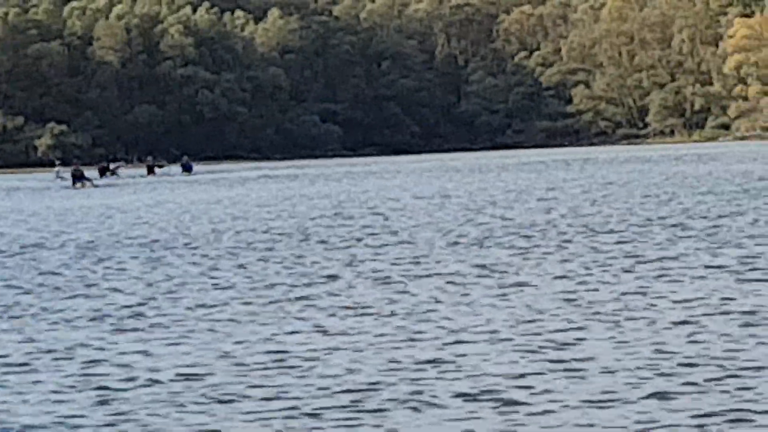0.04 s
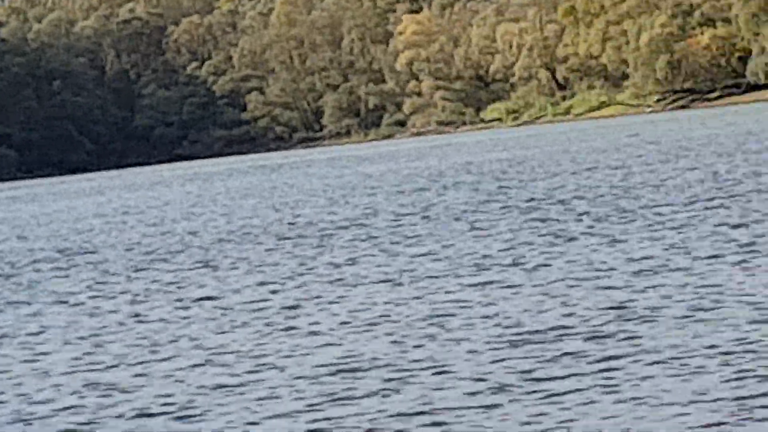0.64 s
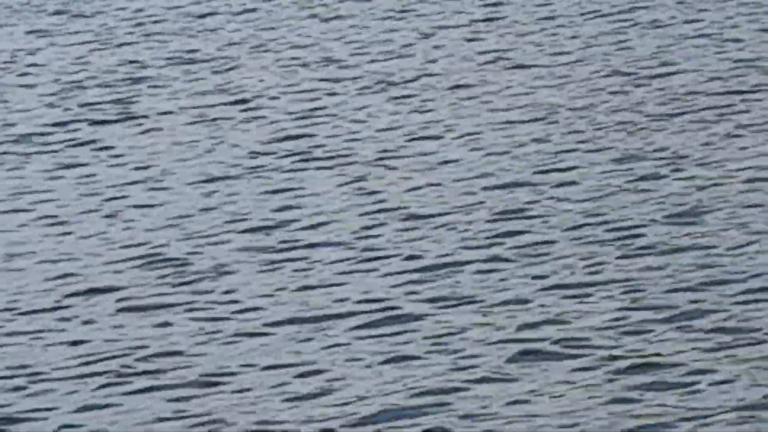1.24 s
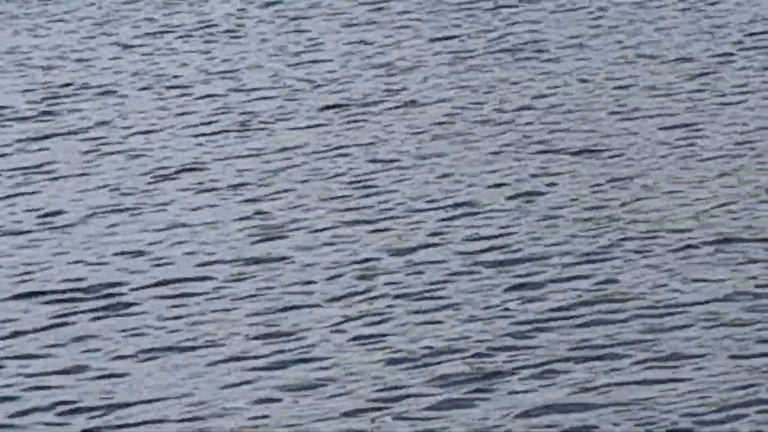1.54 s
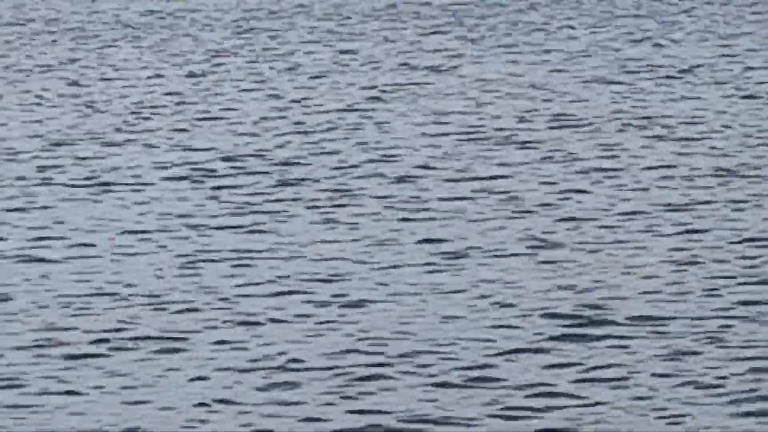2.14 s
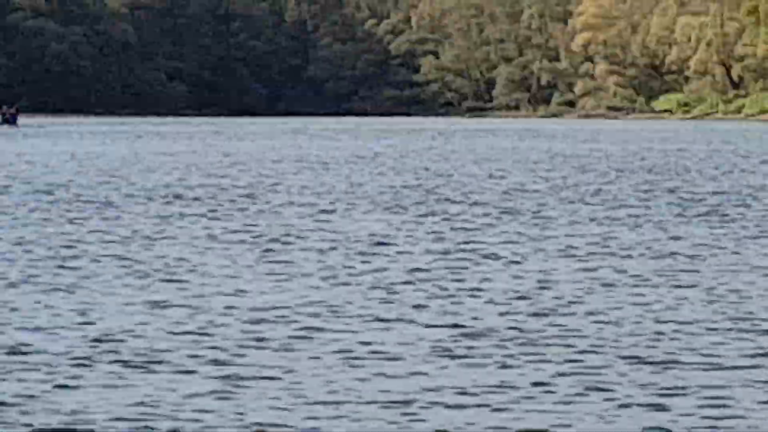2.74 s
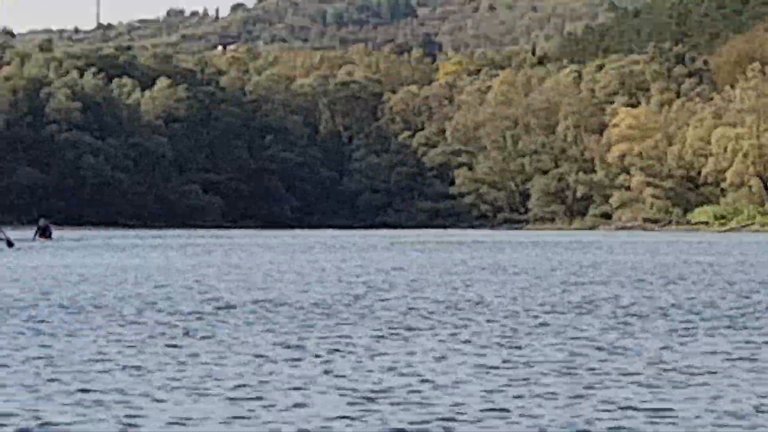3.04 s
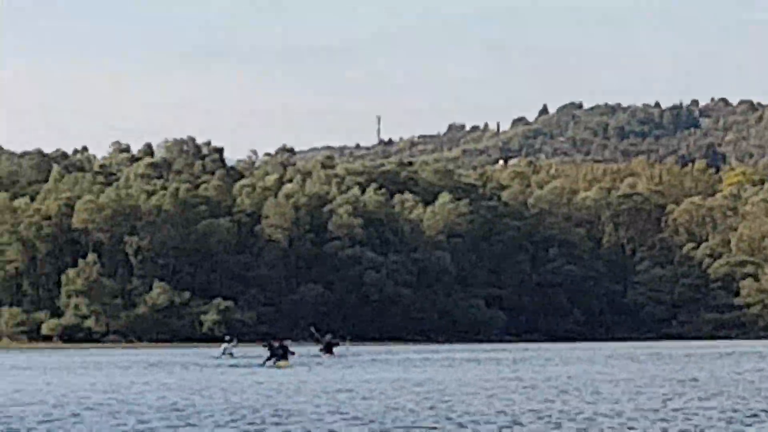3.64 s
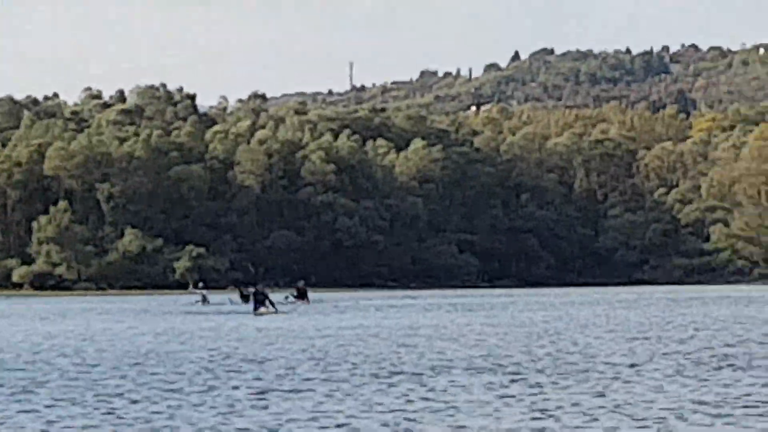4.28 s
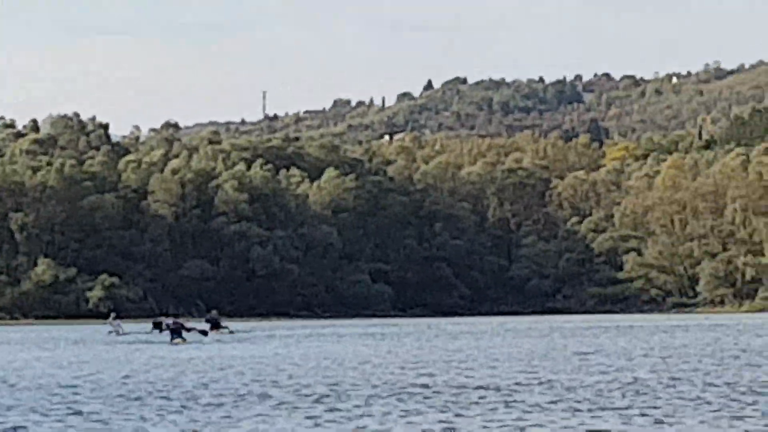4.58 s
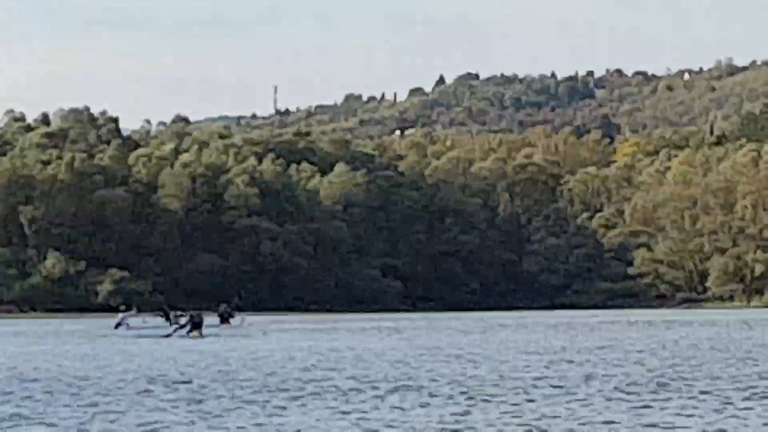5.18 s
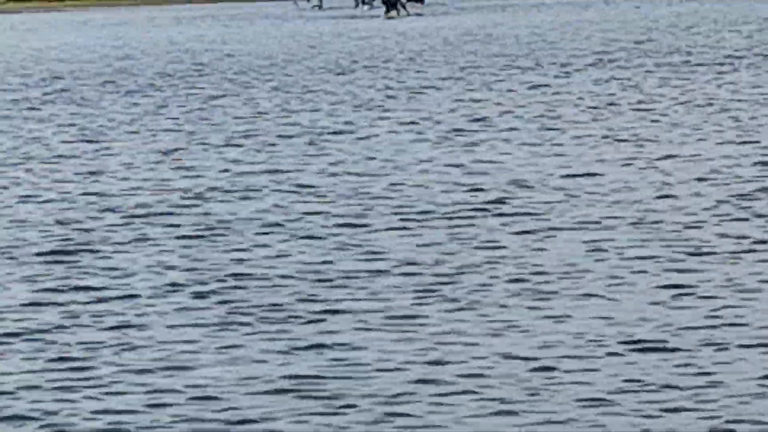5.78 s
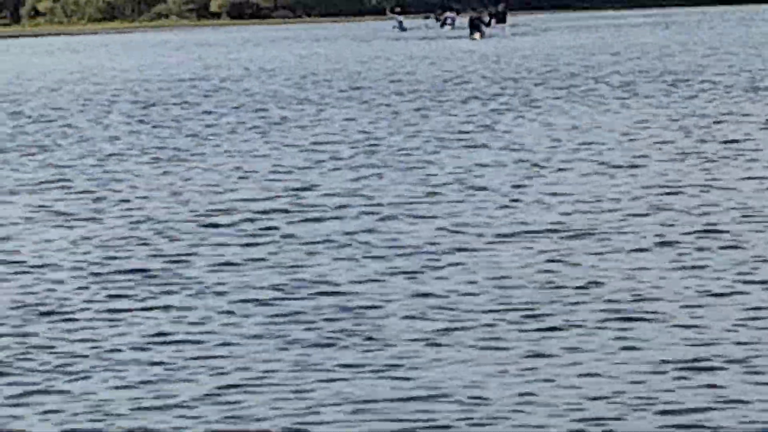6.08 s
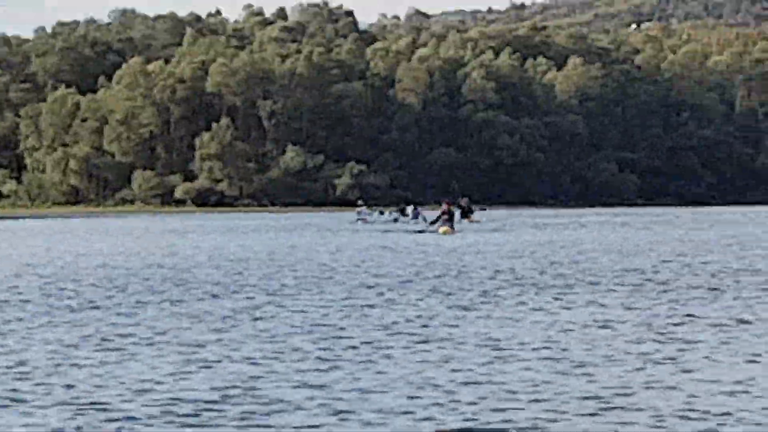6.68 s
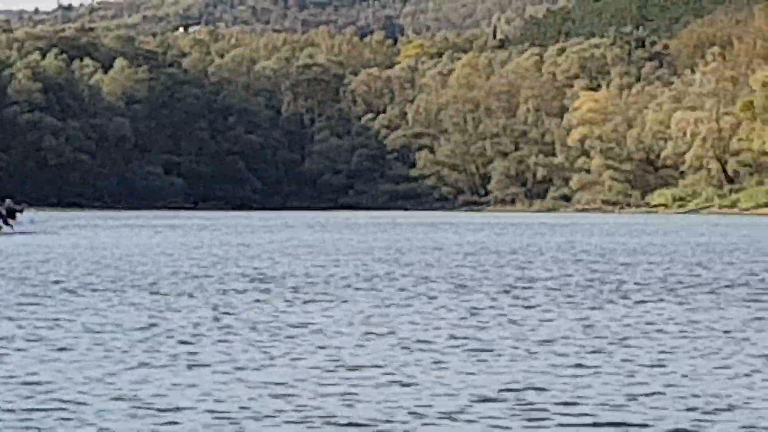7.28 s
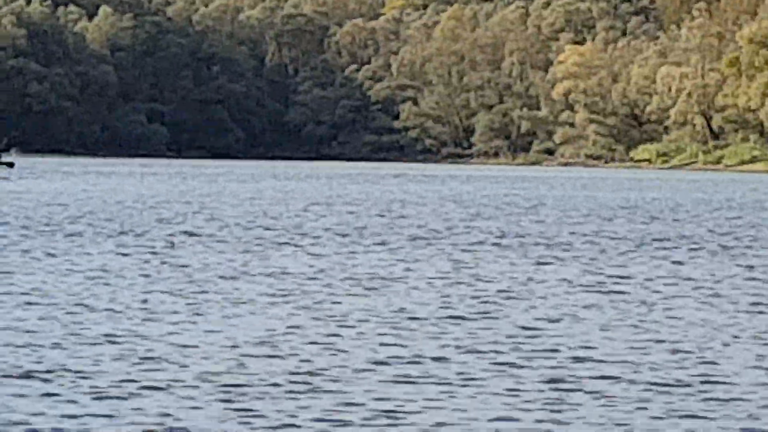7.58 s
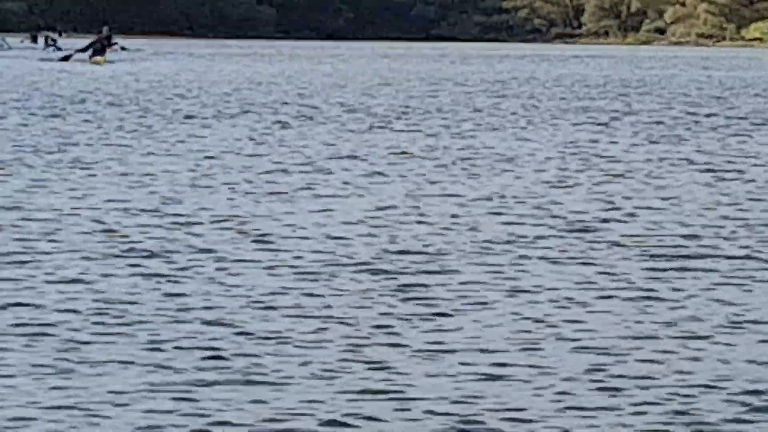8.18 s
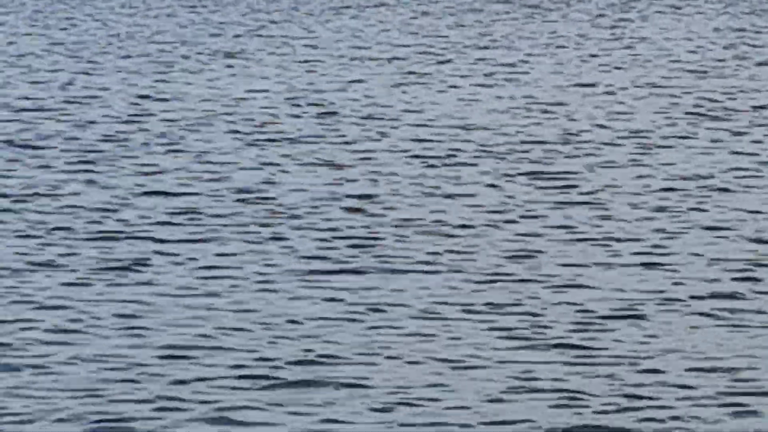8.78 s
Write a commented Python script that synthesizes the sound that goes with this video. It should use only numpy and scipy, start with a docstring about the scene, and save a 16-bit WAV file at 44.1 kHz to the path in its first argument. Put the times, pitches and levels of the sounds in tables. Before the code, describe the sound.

A small motorboat's engine runs at a steady speed for about nine seconds, heard from on board on a calm lake: a low exhaust hum with a fast clatter. Water washes and fizzes along the hull throughout. A light breeze buffets the microphone from alternating sides, with soft low thumps mostly in the first two seconds and occasionally afterwards. A sharp click and knock from a loose fitting comes at about 0.8 seconds. From roughly 2.7 to 5.6 seconds the engine's knock hardens and a loose metal cover rattles in bouts, returning briefly near 7 seconds. More dry ticks and light knocks fall around 1.8, 3.7, 4.2 and 4.8 seconds, with fainter ones after 8. A brief squeak sounds near 4.7 seconds, and tiny high ones follow between 6.4 and 8. The spray's hiss grows slightly from about 5 seconds, peaking near 7.5.

```python
"""A low exhaust hum and a clattering engine, heard on board a small motorboat cruising a calm lake.
The engine fires twice a cycle; midway its knock hardens and a loose valve cover rattles in bouts.
Water washes and fizzes along the hull, and a light breeze buffets the two microphone ports in turn.
Loose fittings tick and knock now and then, and some rub with a brief squeak."""
import sys
import numpy as np
from scipy.fft import rfft, irfft, next_fast_len
from scipy.io import wavfile
from scipy.ndimage import map_coordinates

SR = 44100
rng = np.random.default_rng(int(sys.argv[2]) if len(sys.argv) > 2 else 0)


def log_audio(samples):
    """Write samples as a 16-bit WAV file to the path given in sys.argv[1]."""
    # one column per channel
    frames = np.atleast_2d(samples).T
    # limit to full scale, then quantise
    limited = np.clip(frames, -1, 1)
    pcm = np.round(limited * 32767).astype(np.int16)
    wavfile.write(sys.argv[1], SR, pcm)


N = 393372
TIME = np.arange(N) / SR

# The engine's pace. Each row: time in seconds, cycles a second.
ENGINE_SPEED = [(0.0, 31.29), (0.71, 30.67), (1.13, 31.65), (1.77, 30.64), (2.95, 30.81), (3.3, 31.43),
                (4.54, 30.11), (4.89, 30.73), (6.11, 30.14), (6.71, 30.77), (8.12, 30.77), (8.57, 31.54),
                (8.92, 30.56)]
# The drift of the engine's main stroke. Each row: time in seconds, lateness in cycles.
STROKE_LATENESS = [(2.6, -0.02), (3.3, 0.07), (3.6, 0), (3.9, -0.11), (4.2, -0.1), (4.55, -0.19),
                   (5.25, -0.13), (5.6, -0.16), (7, -0.11)]
# The harmonics of the hum. Each row: multiple of the cycle rate, relative level in dB.
EXHAUST_ORDERS = [(1, -20.5), (2, 0.5), (3, -18), (4, -27.5), (5, -28), (6, -23), (7, -32), (8, -29.5),
                  (9, -31.5), (10, -33), (11, -45), (12, -35.5)]

# Fader rides for engine and water. Each row: time in seconds, level in dB.
CASING_RIDE = [(0, -49.5), (2.3, -48.5), (3.0, -48), (3.65, -46.5), (3.95, -48), (5.5, -48), (5.75, -49),
               (6.9, -47.5), (8.92, -49.5)]
VALVE_RIDE = [(0, -78), (2.3, -71), (3.3, -54.5), (5.8, -58.5), (6.5, -54.5), (7, -54), (8, -54),
              (8.92, -63.5)]
FIRING_RIDE = [(0, -66), (2.3, -59), (2.75, -46), (3.05, -42.3), (3.6, -42), (3.95, -45.5), (4.6, -48),
               (5.35, -46), (5.8, -59), (8.92, -63)]
SPRAY_RIDE = [(0, -69), (2.3, -68), (3.9, -69.5), (5.25, -62), (6.0, -63.5), (7.1, -62), (7.9, -62),
              (8.4, -64.5)]
FOAM_RIDE = [(0, -59.5), (3.1, -61), (4.2, -58.5), (4.8, -54.5), (4.98, -70)]

# How the struck parts ring. Each row: pitch in Hz, bandwidth in Hz, relative level in dB.
CASING_MODES = [(401, 79, 1.5), (634, 99, 2.5), (1091, 60, 0.5), (1270, 37, -27), (1550, 35, 3),
                (1860, 190, -7), (2560, 37, -7), (3040, 71, -8)]
VALVE_MODES = [(1160, 50, -2), (1890, 80, 2), (2510, 70, 4), (3180, 220, -9), (4300, 500, -13)]
BLOCK_MODES = [(362, 75, 8.5), (660, 77, 11.5), (1111, 25, 6), (1240, 58, -1.5), (1590, 21, 4),
               (1980, 230, -12), (2614, 29, -6.5), (2944, 81, -5)]
FITTING_MODES = [(443, 480, 0.5), (604, 91, 7), (718, 42, 8), (966, 175, 4.5), (1290, 187, 5.5),
                 (2050, 300, 0), (2520, 380, -3), (5900, 750, -12.5)]

# The tone of each noise layer. Each row: frequency in Hz, relative level in dB.
EXHAUST_RUMBLE_EQ = [(15, -7), (35, 5.5), (90, 4), (200, -9.5), (350, -18.5), (600, -22), (2000, -58)]
VALVE_RUSTLE_EQ = [(900, -32), (1900, 9), (2550, 4.5), (3200, 6), (4400, 4.5), (5200, -15), (9000, -28)]
FIRING_THUD_EQ = [(200, -15), (370, 0), (510, -5), (690, 4), (900, -5), (1300, -2), (2300, -9), (3100, -6),
                  (3600, -20), (5000, -25), (9000, -45)]
WASH_EQ = [(150, 4), (400, 3.5), (520, -11.5), (700, 7), (850, -1.5), (1200, -1), (2600, -4), (3600, -12.5),
           (5800, -15.5), (6900, -22), (8000, -18), (9000, -48), (16000, -35)]
SPRAY_EQ = [(3000, -28), (5500, -7), (6900, -2.5), (7900, -2), (9000, -2), (10300, -1), (11700, -6),
            (13000, -5), (16000, -12.5)]
FOAM_EQ = [(3400, -24), (4500, 1.5), (5900, 3), (6600, -13), (7850, -3.5), (11000, -29.5)]
BUFFET_EQ = [(20, -13), (50, 2), (100, 5.5), (170, 1), (260, -7.5), (380, -19), (600, -29), (1200, -42),
             (4000, -91)]

# Gusts on the ports. Each row: centre in seconds, width in seconds, left and right levels in dB.
BREEZE_GUSTS = [(0.032, 0.018, -17.5, -21), (0.2, 0.13, -30.5, -20.5), (0.4, 0.047, -32, -20),
                (0.63, 0.035, -30, -23), (0.78, 0.068, -31, -23.5), (1.01, 0.053, -44, -19),
                (1.14, 0.077, -34, -20.5), (1.33, 0.053, -35, -22.5), (1.53, 0.099, -30, -27.5),
                (1.93, 0.11, -46, -23), (2.72, 0.025, -31, -23), (3.73, 0.0086, -21.5, -36),
                (4.02, 0.04, -53, -26), (4.24, 0.068, -22.5, -36), (4.65, 0.051, -33, -26.5),
                (5.5, 0.14, -30, -48), (6.17, 0.16, -31.5, -35), (6.36, 0.1, -28, -33),
                (7.0, 0.11, -26.5, -43), (7.34, 0.019, -44, -26), (8.52, 0.018, -27, -25.5),
                (8.62, 0.041, -27, -37)]
# Single eddies. Each row: centre in seconds, level at the louder port in dB, pitch in Hz,
# left over right in dB.
EDDY_THUMPS = [(0.039, -12.5, 182, 22), (0.247, -11, 177, 20), (0.38, -13, 197, -22), (0.776, -12, 185, 24),
               (0.986, -10, 197, -23), (1.11, -13.5, 199, -23), (1.16, -11.5, 216, -23),
               (1.524, -17, 278, 3), (1.893, -14, 188, -12), (2.607, -10.5, 133, 22), (2.659, -17, 224, -7),
               (4.05, -13, 179, -21), (5.065, -11.5, 200, -26), (5.137, -14, 174, 22),
               (6.147, -16, 195, 22), (6.188, -14, 207, 20), (6.339, -14, 227, 14), (8.612, -13.5, 230, 28)]
# Dry ticks close by. Each row: start in seconds, level in dB, left over right in dB, pitch factor.
CONTACT_TICKS = [(0.7917, -9.5, 17, 2.2), (1.481, -28.5, 14.5, 1.3), (1.523, -29, 11, 1.7),
                 (3.051, -32, -4, 1.1), (3.735, -20, 8, 0.94), (3.762, -23.5, -6, 0.91),
                 (4.112, -30, -4, 0.79), (4.1867, -18.5, -16.5, 0.93), (4.7976, -14, -17, 1),
                 (4.829, -30, -10, 0.92), (5.539, -32, -7, 1.07), (6.283, -30, 5, 1.5),
                 (8.006, -28, 7, 1.1), (8.237, -30, 8, 0.7), (8.67, -32, 8, 1.3), (8.748, -28, 9, 1.4)]
# The ring of a tick. Each row: pitch in Hz, relative level in dB, seconds to die away by 60 dB.
TICK_MODES = [(2520, -6, 0.0094), (4270, 6.5, 0.00062), (6200, 4, 0.0019), (8200, -2.5, 0.0031),
              (11500, -5.5, 0.0018)]
# Loose fittings knocking. Each row: start in seconds, relative strength in dB, extra crack in dB,
# left over right in dB.
FITTING_KNOCKS = [(0.7919, -7.5, 1, 0), (0.81, -22, -18, -2.5), (0.846, -29.5, -5, -4),
                  (0.925, -25.5, -8, -2), (1.5171, -31.5, 4.5, -3), (1.838, -17.5, 0, 1),
                  (2.781, -21, -5, 1), (3.736, -17.5, -1, 3), (4.61, -30, -20, 2), (4.654, -26.5, -17, 3),
                  (4.677, -27, -13, 5), (5.505, -26, -9, 8), (8.033, -33.5, 8.5, 2),
                  (8.671, -31.5, 1, 10.5)]
# Bouts of valve cover rattle. Each row: start in seconds, end in seconds, level in dB, pitch in Hz.
COVER_BOUTS = [(2.85, 3.17, -60.5, 3750), (3.17, 3.68, -56, 3930), (3.68, 4.55, -58.5, 4080),
               (4.85, 5.6, -59, 4090), (6.92, 7.13, -61, 4100)]
# Fittings rubbing. Each row: centre in seconds, pitch in Hz, level in dB, width in seconds,
# relative level of the octave in dB.
FITTING_SQUEAKS = [(4.673, 5600, -46, 0.0027, -35), (4.732, 2935, -37.5, 0.015, -8),
                   (6.427, 6100, -46, 0.0063, -28), (6.624, 6050, -46, 0.01, -30),
                   (7.687, 6100, -47, 0.005, -30), (7.978, 6062, -43.5, 0.0061, -27)]

# The colour of the two ports. Each row: frequency in Hz, left over right in dB.
PORT_BALANCE = [(300, -2), (700, -0.5), (1100, 2), (2500, -0.5), (4000, 3.5), (5600, -6.5), (7000, 4.5),
                (8500, -15), (10000, -12), (11700, -2), (16000, 3)]
# The stereo width of the noise. Each row: frequency in Hz, left-right correlation from -1 to 1.
PORT_LIKENESS = [(100, 0.72), (600, 0.69), (900, -0.13), (1500, -0.34), (2600, -0.23), (4000, -0.16),
                 (16000, 0.13)]


def amp(db):
    """Decibels to gain."""
    return 10 ** (np.asarray(db) / 20)


def unit(x):
    """Scale to rms 1."""
    return x / np.sqrt(np.mean(x ** 2) + 1e-20)


def along(points, hz):
    """Read (Hz, value) points on a log frequency axis."""
    freqs, values = np.transpose(points)
    return np.interp(np.log(hz + 1), np.log(freqs + 1), values)


def ride(points):
    """Join (seconds, value) points into one value a sample."""
    return np.interp(TIME, *np.transpose(points))


def wobble(rate):
    """A smooth random curve, rate knots a second."""
    return map_coordinates(rng.standard_normal(int(N * rate / SR) + 4), [TIME * rate], mode="nearest")


def swell(centre_s, width_s):
    """A bell-shaped rise to 1 and back."""
    return np.exp(-.5 * ((TIME - centre_s) / width_s) ** 2)


def filtered(x, response):
    """Filter x by a complex response of frequency."""
    size = next_fast_len(N + SR // 2)
    return irfft(rfft(x, size) * response(np.fft.rfftfreq(size, 1 / SR)), size)[..., :N]


def coloured(x, eq):
    """Play x through a (Hz, dB) curve, at rms 1."""
    return unit(filtered(x, lambda hz: amp(along(eq, hz))))


def resonant(x, modes):
    """Ring x through (Hz, bandwidth, dB) resonances of alternating polarity, at rms 1."""
    def response(hz):
        return sum((-1) ** k * amp(db) * 1j * hz * width / (pitch ** 2 - hz ** 2 + 1j * hz * width)
                   for k, (pitch, width, db) in enumerate(modes))
    return unit(filtered(x, response))


def noise_pair():
    """White noise at the two ports: alike in the bass, nearly unrelated in the treble."""
    def spread(hz):
        angle = np.arccos(along(PORT_LIKENESS, hz)) / 2
        return np.array([np.cos(angle), np.sin(angle)])
    mid, side = filtered(rng.standard_normal((2, N)), spread)
    return np.array([mid + side, mid - side])


def panned(x, pan_db):
    """Place x with the left pan_db louder than the right."""
    return x * amp(np.array([[pan_db], [-pan_db]]) / 2)


def ports(x):
    """Each microphone port colours the sound in its own way."""
    return filtered(x, lambda hz: amp(np.array([[.5], [-.5]]) * along(PORT_BALANCE, hz)))


def add(track, start_s, sound):
    """Mix a short sound into the track."""
    part = track[:, round(start_s * SR):][:, :sound.shape[1]]
    part += sound[:, :part.shape[1]]


def strokes(cycle, at, width, scatter_db):
    """One smooth burst a cycle, each with its own strength; at and width are in cycles."""
    turn = cycle - at + 2.5
    strength = amp(scatter_db * rng.standard_normal(400))
    return strength[turn.astype(int)] * np.exp(-.5 * ((turn % 1 - .5) / width) ** 2)


def blows(cycle, at):
    """One sharp impulse a cycle, on phase at."""
    return np.diff(np.floor(cycle - at), prepend=np.floor(-at))


def exhaust(cycle):
    """Two firings a cycle hum over a low rumble; their unevenness adds wavering odd orders."""
    hum = np.zeros(N)
    for order, db in EXHAUST_ORDERS:
        unrest = .035 if order == 2 else .3
        angle = 2 * np.pi * (order * cycle + rng.random())
        hum += amp(db) * ((1 + unrest * wobble(7.4)) * np.sin(angle)
                          + unrest * wobble(11) * np.cos(angle))
    return amp(-21) * unit(hum) + amp(-36) * coloured(noise_pair(), EXHAUST_RUMBLE_EQ)


def clatter(cycle, late_cycle):
    """Two blurred strokes a cycle shake the casing and set the valve gear rustling and ringing."""
    main = strokes(late_cycle, at=.01, width=.065, scatter_db=1.2)
    offbeat = strokes(cycle, at=.51, width=.07, scatter_db=2)
    casing = resonant((.5 + .54 * main + .5 * offbeat) * noise_pair(), CASING_MODES)
    rustle = coloured((.33 + .16 * main + offbeat) * noise_pair(), VALVE_RUSTLE_EQ)
    ring = resonant((.079 + .18 * main + offbeat) * noise_pair(), VALVE_MODES)
    return amp(ride(CASING_RIDE)) * casing + amp(ride(VALVE_RIDE)) * (rustle + ring)


def firing_knock(late_cycle):
    """One firm, gritty blow a cycle thuds and rings the block, nearly the same each time."""
    blow = blows(late_cycle, at=.01) * amp(.8 * wobble(30))
    burst = strokes(late_cycle, at=.04, width=.045, scatter_db=1.2)
    tail = strokes(late_cycle, at=.16, width=.09, scatter_db=2)
    grit = unit((burst + .5 * tail) * noise_pair())
    drive = unit(blow) + amp(-14) * grit
    thud = coloured(.55 * drive + grit, FIRING_THUD_EQ)
    return amp(ride(FIRING_RIDE)) * unit(resonant(drive, BLOCK_MODES) + amp(-5.5) * thud)


def water(cycle):
    """The bow wave washes, sprays and fizzes; the wash and a narrow hiss throb with the engine."""
    spray_db, casing_db = ride(SPRAY_RIDE), ride(CASING_RIDE)
    wash_db = -44.5 + casing_db - casing_db.mean()  # rides up and down with the clatter
    throb = sum(strokes(cycle, at, width=.13, scatter_db=2) for at in (.41, .84))
    ripple_db = .5 * wobble(7) + 1.2 * wobble(90) + 2 * (throb - .6)
    wash = amp(wash_db + ripple_db) * coloured(noise_pair(), WASH_EQ)
    spray = amp(spray_db + 2.4 * wobble(180)) * coloured(noise_pair(), SPRAY_EQ)
    hiss_band = [(6100, 590, 0)]
    hiss_db = spray_db + 4 + 5.5 * swell(centre_s=7.5, width_s=.73)
    hiss = amp(hiss_db) * resonant(resonant((.11 + throb) * noise_pair(), hiss_band), hiss_band)
    fizz = amp(ride(FOAM_RIDE)) * coloured(noise_pair(), FOAM_EQ)
    return wash + spray + hiss + fizz


def breeze():
    """Gusts over light air hit each port in quick lumps; the strongest flutter higher in pitch."""
    air = amp(-36.5 + 3.5 * np.array([wobble(9), wobble(9)]))
    gust_power = sum((amp([[left_db], [right_db]]) * swell(centre, width)) ** 2
                     for centre, width, left_db, right_db in BREEZE_GUSTS)
    level_db = 10 * np.log10(air ** 2 + gust_power)
    lumps = amp(5.8 * np.tanh(.8 * np.array([wobble(70), wobble(70)])))
    eddies = lumps * rng.standard_normal((2, N))
    flutter = coloured(lumps * eddies, [(120, -34), (280, -3), (400, -6), (700, -25), (2000, -59)])
    flutter_db = -36.5 + 2.1 * (level_db - level_db.max())
    return amp(level_db) * coloured(eddies, BUFFET_EQ) + amp(flutter_db) * flutter


def thumps(width_cycles=.37):
    """An eddy breaks on a port: a soft low push of a cycle or two."""
    track, t = np.zeros((2, N)), np.arange(-SR // 50, SR // 50) / SR
    for centre, db, hz, pan_db in EDDY_THUMPS:
        push = np.exp(-.5 * (hz * t / width_cycles) ** 2) * np.sin(2 * np.pi * (hz * t + rng.random()))
        add(track, centre + t[0], amp(db - abs(pan_db) / 2) * panned(push, pan_db))
    return track


def ticks():
    """Hard little contacts: a bright snap and a ring, gone within milliseconds."""
    track, t = np.zeros((2, N)), np.arange(SR // 50) / SR
    for start, db, pan_db, pitch in CONTACT_TICKS:
        ring = np.zeros((2, len(t)))
        for hz, mode_db, t60 in TICK_MODES:
            detuned_hz = hz * pitch * rng.normal(1, .014)
            angle = 2 * np.pi * (detuned_hz * t + rng.random((2, 1)))
            ring += amp(mode_db - 60 * t / t60) * np.sin(angle)
        snap = amp(-12 - 60 * t / .01) * rng.standard_normal((2, len(t)))
        tick = ring + snap
        add(track, start, amp(db) * panned(tick / np.abs(tick).max(), pan_db))
    return track


def knocks(crack_t60=.026, chatter_t60=.054, blow_delay_s=.00096):
    """A loose fitting strikes: a bright crack and a solid blow, then a short hollow chatter."""
    cracks, chatter, t = np.zeros((2, N)), np.zeros((2, N)), np.arange(SR // 5) / SR
    for start, db, crack_db, pan_db in FITTING_KNOCKS:
        rough = rng.standard_normal((2, 2, len(t))) + .36 * rng.standard_normal((2, 1, len(t)))
        crack_shape = amp(db + crack_db - 60 * t / crack_t60) * (1 - np.exp(-t / .00049))
        chatter_shape = amp(db - 60 * t / chatter_t60) * (1 - np.exp(-t / .0003))
        add(cracks, start, crack_shape * panned(rough[0], pan_db))
        add(chatter, start, chatter_shape * panned(rough[1], pan_db))
        add(chatter, start + blow_delay_s, amp(db + 13) * panned(np.ones(1), pan_db))
    crack_eq = [(200, -3), (600, -19), (5000, -2), (9000, -14), (16000, -33)]
    bright = filtered(cracks, lambda hz: amp(along(crack_eq, hz)))
    return amp(1) * bright + amp(-44.5) * resonant(chatter, FITTING_MODES)


def valve_cover(cycle, late_cycle, fade_s=.08, rise_hz_per_cycle=2300):
    """The loose cover scrapes once a cycle with a rising zip; brushes and taps ring its lower note."""
    main = strokes(late_cycle, at=.02, width=.06, scatter_db=1)
    offbeat = strokes(cycle, at=.55, width=.07, scatter_db=2)
    brush = unit((main + .8 * offbeat) * noise_pair())
    tap = unit(blows(late_cycle, at=.975))
    body = resonant(brush + .6 * tap, [(1850, 200, 0)])
    sweep_hz = rise_hz_per_cycle * ((late_cycle + .5) % 1 - .5)
    track = np.zeros((2, N))
    for start, end, db, hz in COVER_BOUTS:
        bout = np.clip(.5 + np.minimum(TIME - start, end - TIME) / fade_s, 0, 1)
        angle = 2 * np.pi * np.cumsum(hz + sweep_hz) / SR + .7 * wobble(900)
        scrape = unit(strokes(late_cycle, at=-.01, width=.048, scatter_db=.7) * np.sin(angle))
        track += amp(db) * bout * (scrape + amp(1) * body)
    return track


def squeaks():
    """Fittings rub briefly with a rough pitch; the octave shows at the height of the rub."""
    track = np.zeros(N)
    for centre, hz, db, width, octave_db in FITTING_SQUEAKS:
        angle = 2 * np.pi * np.cumsum(hz * (1 + .018 * wobble(500))) / SR
        rub = swell(centre, width)
        track += amp(db) * (rub * np.sin(angle) + amp(octave_db) * rub ** 2 * np.sin(2 * angle))
    return panned(track, pan_db=8)


def scene():
    """Engine, water and ticks take the ports' colour; hum, wind, knocks and squeaks go in straight."""
    cycle = np.cumsum(ride(ENGINE_SPEED)) / SR  # engine cycles turned so far
    late_cycle = cycle - ride(STROKE_LATENESS)
    engine = clatter(cycle, late_cycle) + firing_knock(late_cycle) + valve_cover(cycle, late_cycle)
    bed = exhaust(cycle) + ports(engine + water(cycle) + ticks())
    return bed + breeze() + thumps() + knocks() + squeaks()


def record(dry):
    """The recorder keeps nothing above 16 kHz."""
    return filtered(dry, lambda hz: hz < 16000)


dry = scene()
out = record(dry)
log_audio(out)
```